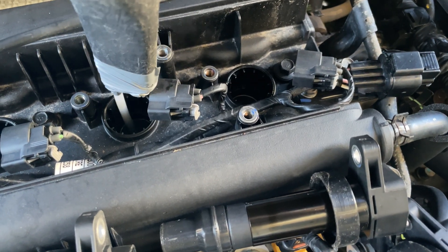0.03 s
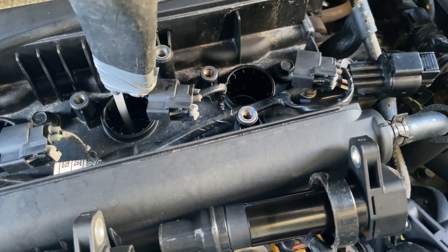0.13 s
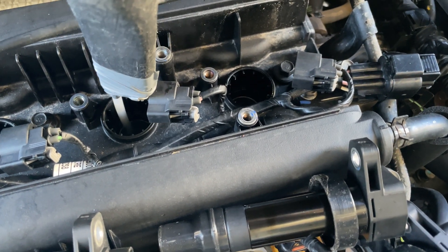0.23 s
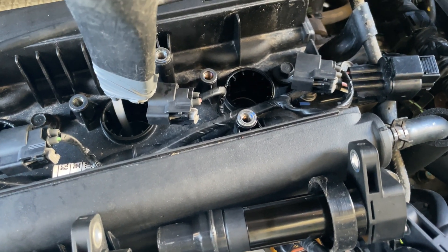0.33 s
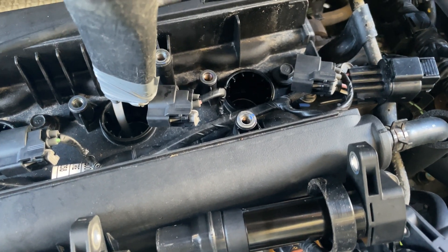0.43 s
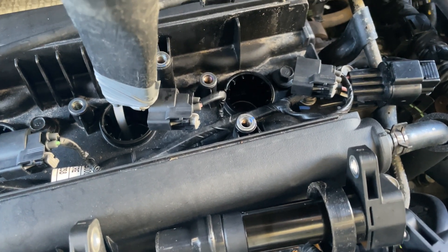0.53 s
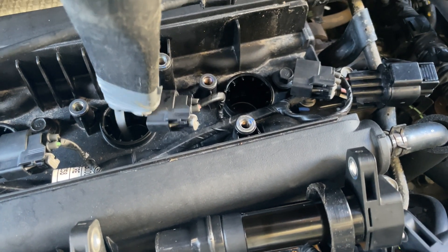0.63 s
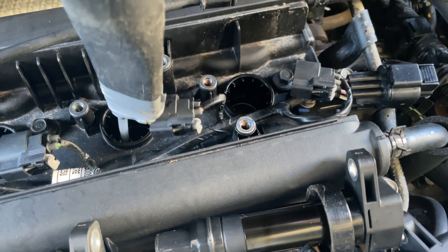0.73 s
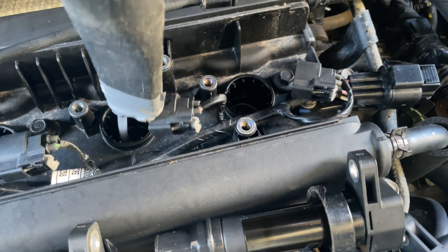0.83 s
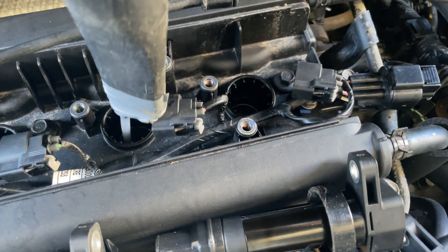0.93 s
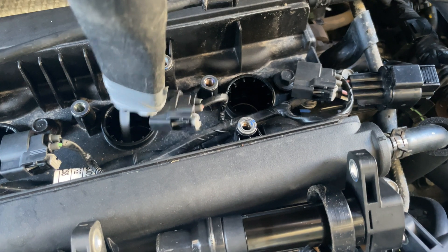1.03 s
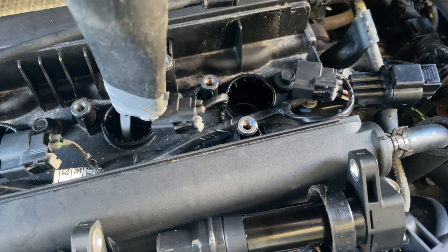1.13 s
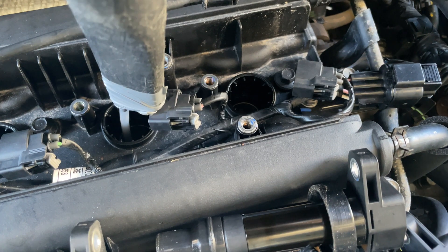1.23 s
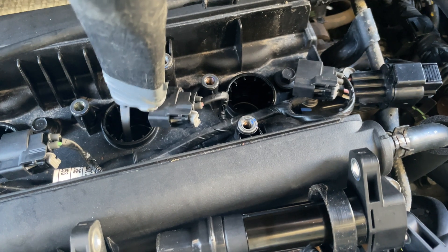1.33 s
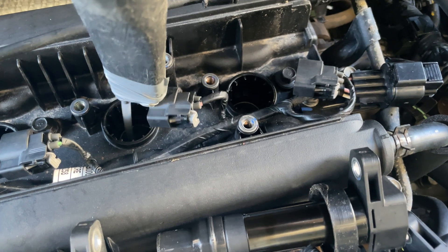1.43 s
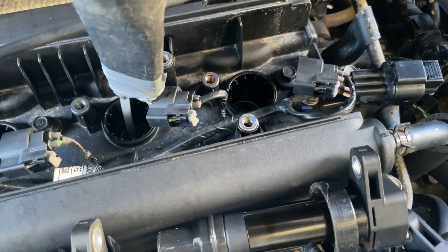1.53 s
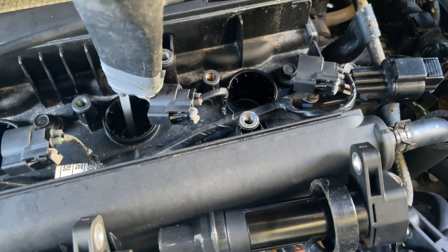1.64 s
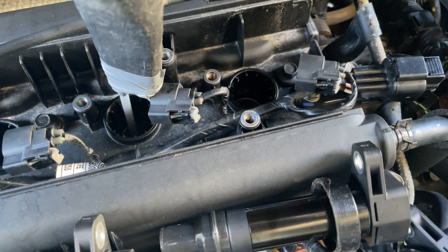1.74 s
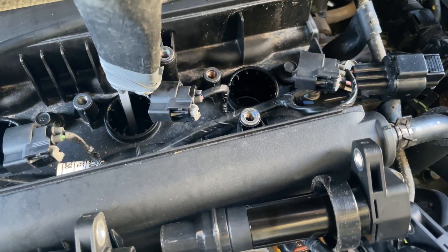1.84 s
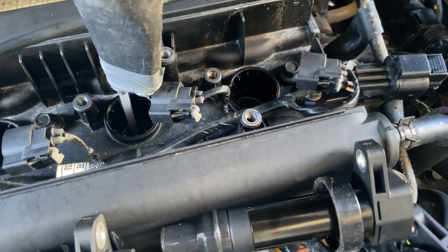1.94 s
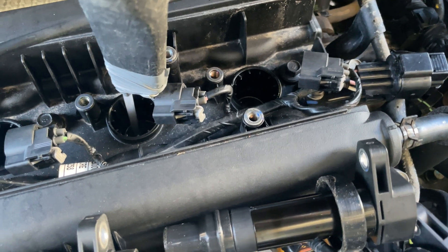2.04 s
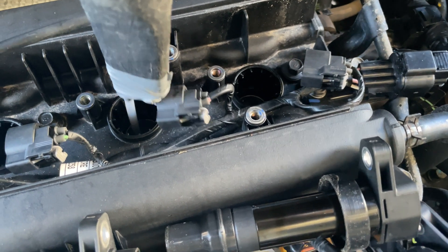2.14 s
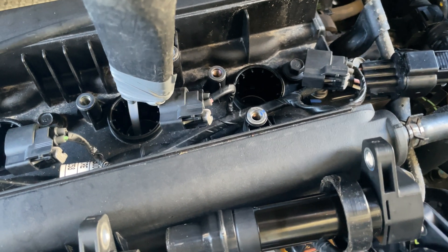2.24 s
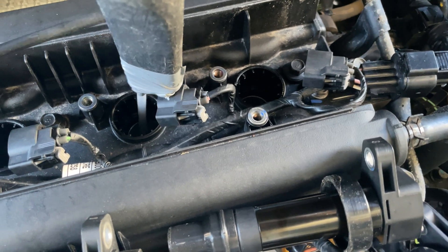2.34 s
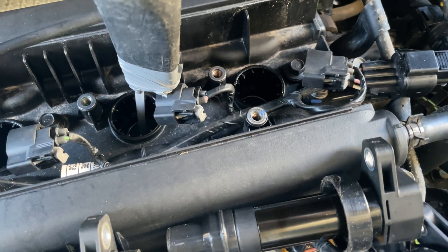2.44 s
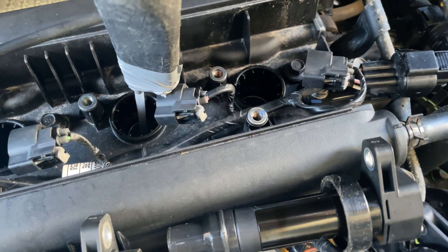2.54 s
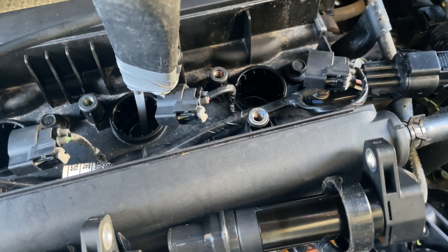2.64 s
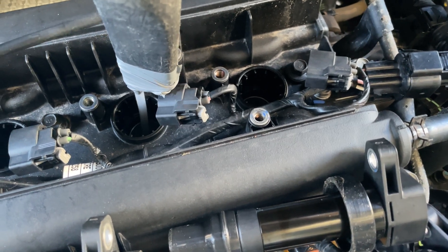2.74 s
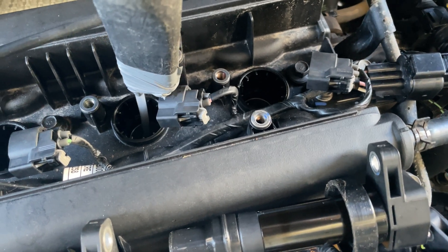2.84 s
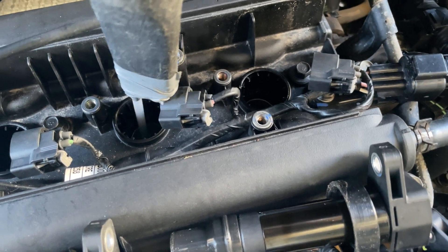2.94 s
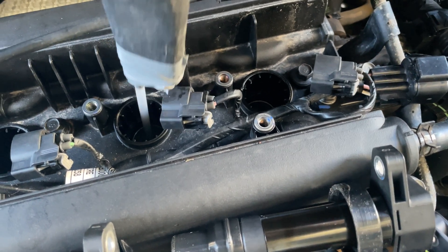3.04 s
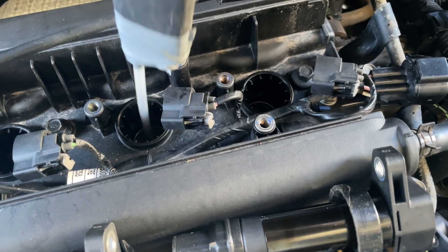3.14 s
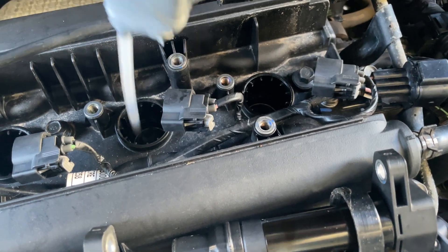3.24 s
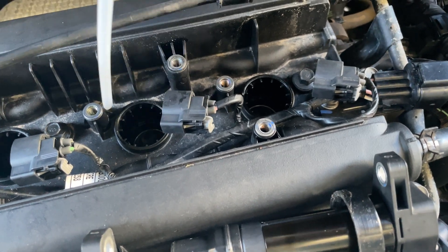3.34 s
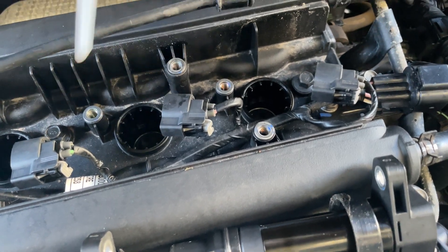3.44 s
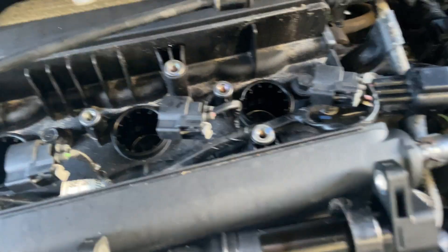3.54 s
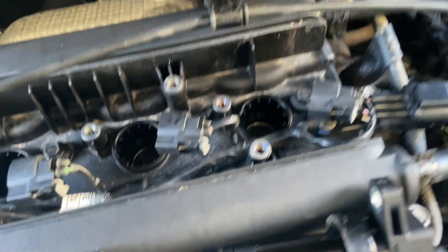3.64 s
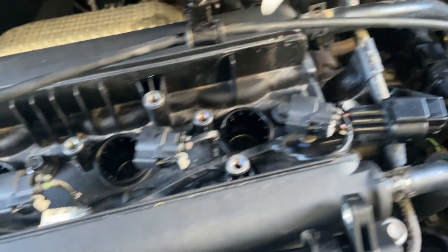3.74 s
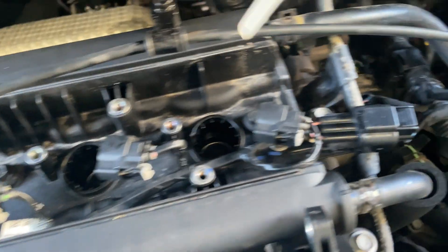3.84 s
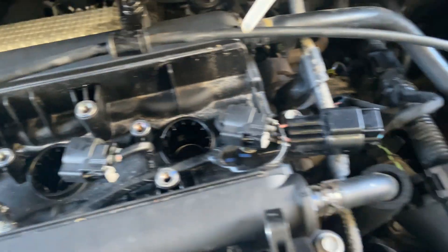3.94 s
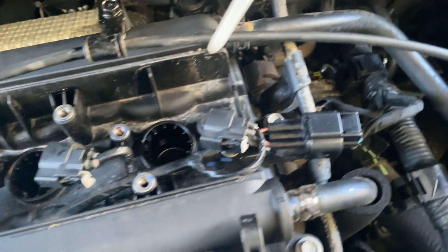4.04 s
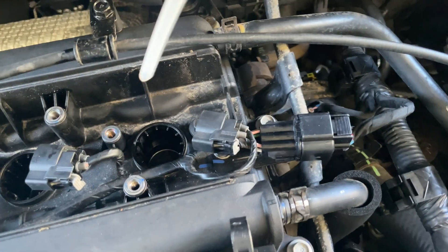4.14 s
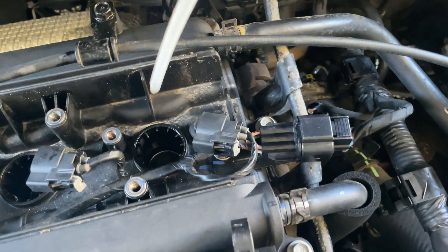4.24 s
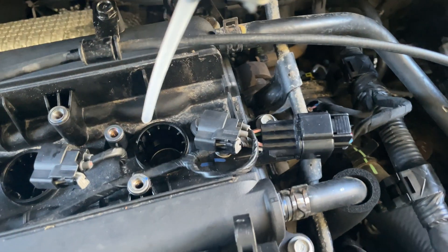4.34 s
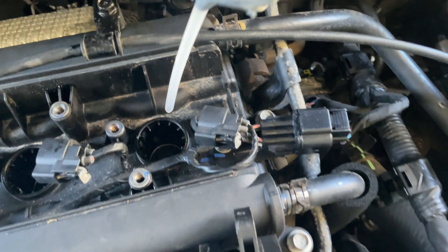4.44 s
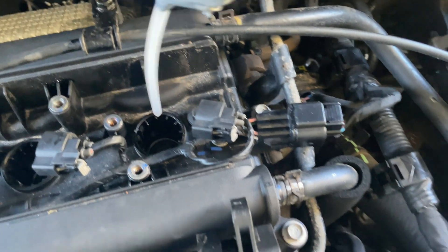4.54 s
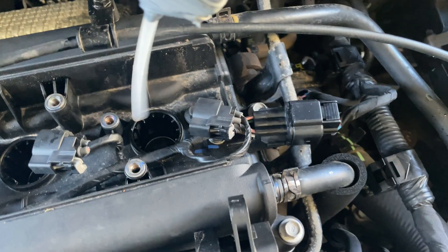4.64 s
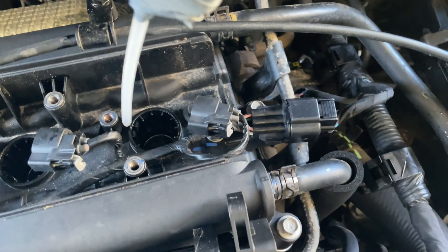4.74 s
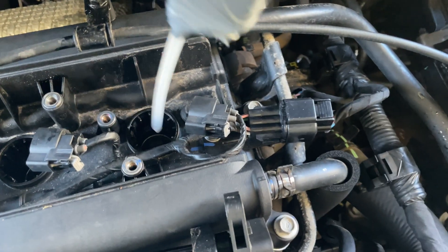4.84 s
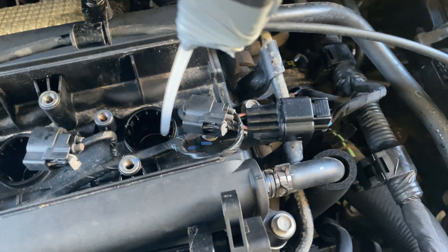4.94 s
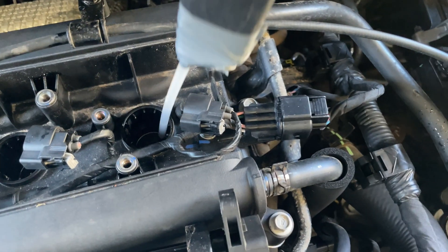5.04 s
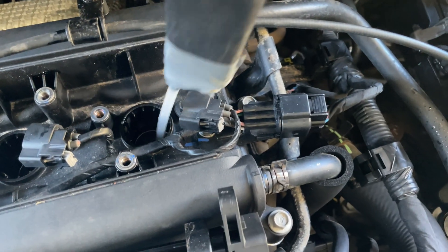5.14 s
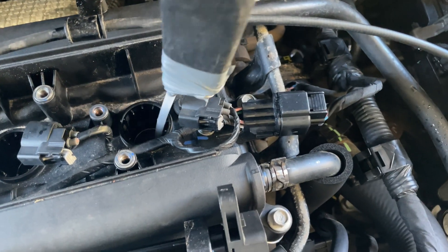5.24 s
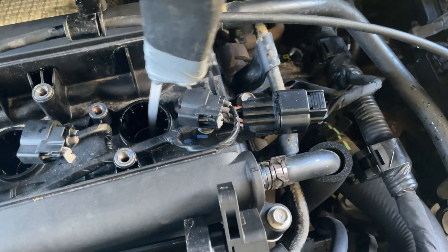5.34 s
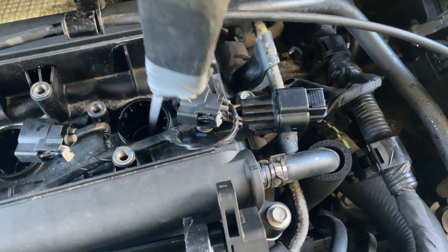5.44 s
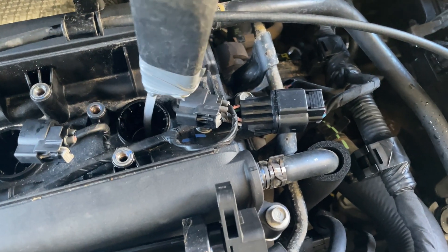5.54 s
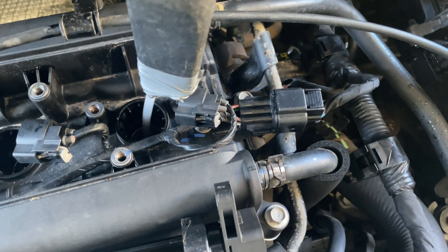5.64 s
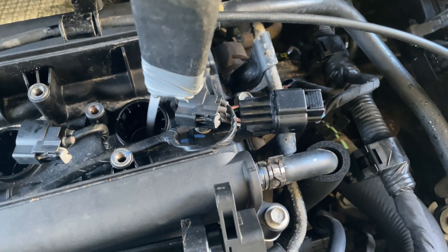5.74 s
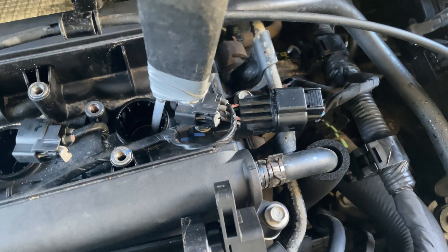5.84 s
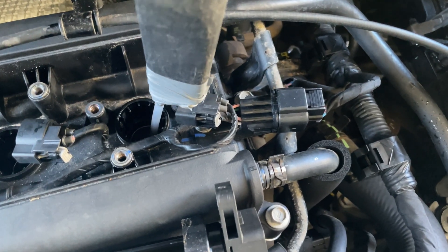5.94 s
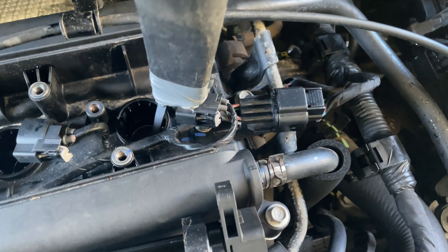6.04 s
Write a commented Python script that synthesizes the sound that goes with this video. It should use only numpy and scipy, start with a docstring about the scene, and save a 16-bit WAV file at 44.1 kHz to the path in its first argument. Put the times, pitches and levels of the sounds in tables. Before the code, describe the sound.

Wet, throaty vacuum slurping rings in a deep engine hole, pauses over fan whine and spitting drops, then resumes louder and more bubbly.

```python
"""A vacuum cleaner sucks water from an engine's spark-plug wells through a thin tube, heard close by.
0-3.3 s: air and water gurgle at the tip and ring the first well like a stopped pipe; air whistles through
a narrow gap until about 0.55 s, then in four squirts up to 1.9 s. 3.1-3.4 s: the tube is lifted out.
3.3-4.8 s: drops spit at the tip; the motor grows louder near 3.9 s. From 4.6 s: the tip enters the next well.
Gurgle is bursty noise through resonances, slugs and bubbles are decaying sines, the motor is orders and air."""
import sys
import numpy as np
from scipy import signal
from scipy.fft import rfft, irfft, next_fast_len
from scipy.io import wavfile
from scipy.ndimage import uniform_filter1d, map_coordinates

SR = 44100
rng = np.random.default_rng(int(sys.argv[2]) if len(sys.argv) > 2 else 0)


def unload_audio(sound):
    """Save the sound as a 16-bit wav file, at the path given as the first command line argument."""
    columns = np.transpose(np.atleast_2d(sound))
    # keep every value between -1 and 1, then stretch to whole-number steps
    steps = np.round(np.clip(columns, -1, 1) * 32767)
    wavfile.write(sys.argv[1], SR, steps.astype(np.int16))


N = 269010

# suction of air and water through the tip, before each layer's trim: time_s, level_db
DRAW = [(0, -26.5), (.25, -25.5), (.75, -24.5), (1.05, -26), (1.5, -25.5), (1.7, -23.5), (2.4, -23.5),
        (3.1, -21.5), (5.0, -19.5), (5.45, -22), (5.85, -17), (6.01, -23.5), (6.1, -33.5)]
# tip lifted out of the first well: time_s, depth (0 open air, 1 bottom)
LIFT = [(3.06, .9), (3.1, .86), (3.12, .68), (3.175, .65), (3.205, .46), (3.3, .3), (3.325, .12),
        (3.37, .04)]
# tip lowered into the next well: time_s, depth (0 open air, 1 bottom)
LOWER = [(4.6, 0.0084), (4.86, 0.063), (4.89, 0.25), (5.015, 0.06), (5.035, 0.35), (5.14, 0.49),
         (5.19, 0.59), (5.33, 0.78), (5.5, 0.87)]
# lowest resonance of the well: time_s, resonance_hz
WELL_HZ = [(2.9, 814), (3.1, 790.6), (3.3, 825.4), (4.85, 832), (5.12, 818), (5.8, 825.5)]
# lowest resonance, spectrum shape: freq_hz, density_db_per_hz
RING = [(400, -46), (650, -29.5), (750, -3), (795, 0.5), (822, 4.5), (850, 3.5), (895, -22.5), (1100, -44)]
# upper shoulder of the lowest resonance: freq_hz, density_db_per_hz
SHOULDER = [(800, -35), (905, -2), (965, -0.5), (1075, 4), (1150, -4.5), (1220, -10.5), (1350, -14.5),
            (1700, -43)]
# broad band below the third resonance: freq_hz, density_db_per_hz
THIRD = [(1500, -25), (1900, -16), (2080, -2), (2300, 1), (2390, 0.5), (2460, 0.5), (2530, -3.5),
         (2650, -9), (3000, -38.5)]
# fifth pipe resonance: freq_hz, density_db_per_hz
FIFTH = [(2800, -25.5), (3500, 1), (3850, 2), (4200, 1), (4800, -24)]
# wet splash in the well: freq_hz, density_db_per_hz
SPLASH = [(200, -20), (350, -6), (520, 0), (740, 8), (900, -8), (1250, 1.5), (1600, -4), (2600, -8.5),
          (3200, -19), (12000, -26)]
# big slugs of water swallowed by the tube, levels before trim:
# start_s, pitch_hz, throb_db, length_s, splash_db
GULPS = [(0.169, 840, -14.5, 0.019, -25), (0.456, 820, -15, 0.0092, -25), (0.64, 800, -13.5, 0.01, -19),
         (0.899, 801, -15.5, 0.017, -19.5), (1.071, 833, -13, 0.017, -20.5),
         (1.093, 833, -13.5, 0.018, -19.5), (1.237, 757, -16.5, 0.015, -18),
         (1.263, 810, -13.5, 0.012, -18), (1.402, 805, -9, 0.019, -20), (1.603, 818, -14, 0.022, -18.5),
         (1.776, 810, -20, 0.0086, -21), (1.923, 833, -14, 0.01, -29), (2.061, 818, -12.5, 0.012, -30),
         (2.113, 795, -11.5, 0.012, -23.5), (2.158, 777, -18, 0.016, -21.5),
         (2.175, 838, -17, 0.057, -22.5), (2.315, 769, -15.5, 0.016, -24), (2.342, 796, -15, 0.019, -25),
         (2.382, 822, -16, 0.017, -23), (2.436, 824, -13, 0.02, -36), (2.453, 824, -11, 0.025, -23),
         (2.476, 828, -14.5, 0.017, -40), (2.594, 790, -10, 0.0056, -25), (2.681, 834, -15.5, 0.032, -23),
         (2.734, 799, -17, 0.0095, -30), (2.791, 815, -15, 0.015, -19), (2.849, 810, -13.5, 0.01, -24),
         (3.04, 774, -10.5, 0.015, -20.5), (3.06, 780, -13, 0.014, -28), (3.132, 775, -14, 0.0098, -22),
         (3.201, 777, -13, 0.014, -18), (3.231, 775, -22, 0.013, -15), (3.261, 815, -24, 0.023, -21),
         (3.289, 850, -19.5, 0.034, -30), (3.32, 814, -21, 0.018, -30), (4.876, 818, -17.5, 0.017, -24),
         (4.908, 878, -19, 0.028, -28), (4.951, 815, -14, 0.01, -20), (4.965, 833, -12, 0.011, -30),
         (4.986, 813, -20.5, 0.026, -36), (5.023, 825, -19, 0.022, -14), (5.058, 819, -6, 0.0086, -25),
         (5.07, 819, -6.5, 0.0073, -26), (5.081, 817, -12.5, 0.019, -22), (5.1, 821, -15, 0.017, -25),
         (5.121, 801, -15, 0.011, -33), (5.145, 826, -19, 0.013, -21), (5.206, 817, -2.5, 0.024, -23),
         (5.234, 824, -7, 0.011, -22), (5.271, 856, -3, 0.011, -15.5), (5.322, 813, -11.5, 0.02, -22),
         (5.378, 826, -6, 0.018, -21), (5.438, 864, -8.5, 0.0094, -17), (5.541, 798, -10, 0.012, -18),
         (5.555, 831, -9, 0.016, -23), (5.594, 841, -12, 0.013, -35), (5.621, 817, -7.5, 0.017, -31),
         (5.667, 832, -7.5, 0.014, -23), (5.724, 816, -11, 0.013, -26), (5.76, 837, -11, 0.017, -24),
         (5.774, 847, -7, 0.015, -27), (5.8, 812, -6.5, 0.023, -27), (5.976, 817, -11, 0.033, -28)]
# single bubbles bursting at the tip: start_s, level_db
POPS = [(.607, -12), (.648, -10.5), (.665, -13), (.726, -11.5), (.770, -9.5), (.779, -17), (.809, -9.5),
        (.819, -13), (.953, -10), (1.169, -17), (1.357, -6.5), (1.379, -12.5), (1.446, -14.5), (1.715, -14),
        (1.824, -12.5), (1.853, -11), (1.889, -7.5), (1.975, -12), (2.005, -12.5), (2.085, -14),
        (2.138, -12), (2.240, -12), (2.396, -7), (2.503, -8.5), (2.551, -19), (2.601, -8), (2.645, -11),
        (2.896, -9.5), (3.004, -12), (3.019, -15), (3.040, -15), (3.074, -8.5), (3.099, -15),
        (3.143, -13.5), (3.169, -11.5), (5.179, -7.5), (5.422, -12), (5.471, -9.5), (5.485, -18),
        (5.501, -6.5), (5.512, -6), (5.658, -5.5), (5.715, -6.5), (5.823, -3), (5.840, -7), (5.865, -6.5),
        (5.904, -11), (5.928, -5), (5.955, -13), (6.004, -13), (6.032, -12.5)]
# what a bursting bubble rings: multiple of the lowest resonance, level_db, decay_s
POP_MODES = [(1, -3, 0.0084), (1.3, -4.5, 0.0032), (2.96, -15.5, 0.0027)]
# water spitting at the tip in open air: start_s, level_db, decay_s
SPITS = [(3.33, -28, 0.026), (3.398, -30, 0.041), (3.635, -39, 0.05), (4.175, -30.5, 0.072),
         (4.3, -34, 0.046), (4.398, -22.5, 0.021), (4.641, -26, 0.061), (4.675, -34, .02),
         (4.697, -29.5, 0.032), (4.79, -35, 0.089)]
# spitting drops: freq_hz, density_db_per_hz
SPRAY = [(250, -15), (380, 0.5), (500, -7), (660, -3), (830, 9), (960, -9), (1130, 4.5), (1450, -6),
         (2400, -7), (2750, -5), (2950, -13), (6000, -19), (14000, -26)]
# air squeezed through a narrow gap until it closes, before each layer's trim: time_s, level_db
GAP_FLOW = [(0, -22.5), (.13, -21), (.335, -20.5), (.36, -25.5), (.45, -24.5), (.48, -32), (.525, -28),
            (.55, -55), (.7, -68)]
# brief squirts of air through the gap, before each layer's trim: centre_s, level_db, half_length_s
SQUIRTS = [(.872, -24.5, 0.016), (1.184, -24.5, 0.013), (1.53, -33, 0.0063), (1.873, -32, 0.0064)]
# hiss of the gap: freq_hz, density_db_per_hz
GAP = [(2000, -16.5), (3100, -13), (3700, -11), (4300, -10), (5000, -16), (5750, -9), (6600, -19),
       (7200, -9), (7700, -14), (10700, 1), (11800, 0.5), (12600, -6), (13500, -4), (14800, -18),
       (15800, -23)]
# resonances of the gap: freq_hz, width_hz, level_db re full flow, gain_db per dB of flow
GAP_MODES = [(5370, 220, -15.5, 1.1), (7100, 110, -9, 3.8), (7270, 460, -12, 0.5)]
# motor as heard from a moving microphone: time_s, shaft_tone_db, blade_whine_db
MOTOR = [(0, -40.5, -52.5), (2, -42, -47), (3.3, -42, -51), (3.78, -41.5, -49), (3.88, -37, -40),
         (4.05, -35, -44), (4.95, -34, -47), (5.12, -33.5, -42), (5.45, -33.5, -37), (6.1, -35, -38)]
# shaft orders following the shaft tone: multiple, level_db
OVERTONES = [(1, -2.5), (2, -19.5)]
# high shaft orders following the blade whine: multiple, level_db
WHINE = [(9, -13), (12, -3)]
# mains hum at the mean shaft-tone level: freq_hz, level_db
HUM = [(100, -52), (200, -57)]
# air moved by the fan, before each layer's trim: time_s, level_db
AIRFLOW = [(.6, -38), (1.2, -36), (2.9, -36.5), (3.8, -38), (3.89, -35.5), (4.7, -34.5), (5.9, -33.5),
           (6.1, -36)]
# blown air, middle band: freq_hz, density_db_per_hz
EXHAUST = [(1500, -22), (2550, -7.5), (2850, -2.5), (3050, -3), (3300, -4), (3700, 0), (4020, -1.5),
           (4430, -0.5), (4920, -17), (5080, -19), (7000, -58.5)]
# blown air, treble: freq_hz, density_db_per_hz
RUSH = [(2500, -13), (4700, -5), (5300, 4.5), (5750, 6.5), (6400, 1.5), (7800, 3.5), (9300, 3),
        (11000, -2.5), (12600, 4), (14000, -6), (15800, -9.5)]
# blown air, bass: freq_hz, density_db_per_hz
RUMBLE = [(20, -58), (60, -13), (150, -12.5), (240, -16), (360, 0.5), (430, -5), (490, -1), (700, -7.5),
          (1080, -8.5), (1220, -16), (1420, -14.5), (1620, -10.5), (2050, -9.5), (3500, -45)]
# resonances of the motor's air duct: freq_hz, width_hz, level_db
DUCT = [(1830, 200, -23), (3250, 200, -10.5), (3490, 260, -9.5), (4225, 100, -4.5), (4550, 93, 2),
        (4747, 200, -1), (4890, 120, -8), (5590, 170, -6), (5860, 230, -2.5), (6080, 260, -5.5),
        (6680, 430, -6)]
# air in the duct: time_s, lower_resonances_db, upper_resonances_db
DUCT_LEVEL = [(0, -45.5, -47), (3.3, -48.5, -52), (3.72, -45.5, -51), (3.9, -40.5, -42), (4.1, -39.5, -42),
              (4.95, -39.5, -44), (5.3, -38.5, -38.5), (5.5, -41.5, -39), (5.9, -40, -38),
              (6.1, -43.5, -43)]
# left-right likeness by frequency: freq_hz, likeness
ALIKE = [(100, 0.37), (2400, 1), (3200, 0.27), (5500, 0.46), (8000, 0.82), (9700, 1), (11000, 1),
         (11800, 0.7), (13200, 0.47), (14200, .98)]
# left-right phase difference by frequency: freq_hz, phase_rad
PHASE = [(300, -.04), (550, -.05), (810, -.3), (980, -.14), (1500, 0), (5000, 0), (6500, .7), (8500, 2.7),
         (9600, 3.12), (11000, 3.16), (13200, 4.9), (14000, 6.28)]

NODE_LEAK = 0.16  # share of a resonance still driven at a node, times depth
HOLLOW_HZ, HOLLOW_WIDTH_HZ, HOLLOW_SHARE = 890, 34, 0.39  # dip between lowest resonance and shoulder
THIRD_HZ, THIRD_WIDTH_HZ = 2438, 160
THIRD_FLUTTER_DB, THIRD_FLUTTER_KNOTS_PER_S = 1.6, 35
CHOKE_LEAD_S, CHOKE_S, CHOKE_DB = .001, .006, 4
GULP_ATTACK_S, GULP_DECAY_S, GULP_RELEASE_S = 0.0021, 0.039, 0.0029
THROB_TRIM_DB, WET_TRIM_DB = -2.1, -4.5
THROB_THIRD_DB = -21  # third resonance re lowest, both driven alike
POP_ATTACK_S, POP_SCATTER = .0008, .012  # scatter: relative detuning
SPATTER_DB, SPATTER_DECAY_S = -17, .009  # level re the bubble's
SPIT_RISE_S = 0.0045
LEAK_DB, LEAK_FADE_DB_PER_S = -39, 2
SHAFT_HZ = 548.2
HUM_FOLLOWS = 0.33  # dB of hum per dB of shaft tone
DUCT_SPLIT_HZ = 5200  # lower resonances lie below this
DUCT_DRIFT, DUCT_SWELL_DB = .0025, 1.2  # drift: relative pitch
LOW_CUT_HZ, TOP_HZ = 42, 15850


def amp(db):
    """Decibels to gain."""
    return 10 ** (np.asarray(db) / 20)


def unit(x):
    """x at rms 1."""
    return x / np.sqrt(np.mean(x ** 2) + 1e-20)


def clock():
    """Time of every sample, in seconds."""
    return np.arange(N) / SR


def age(start_s):
    """Seconds since start_s, zero before it."""
    return np.maximum(clock() - start_s, 0)


def along(points, hz):
    """(freq_hz, value) points read on a log frequency axis."""
    f, v = np.transpose(points)
    return np.interp(np.log(hz + 1), np.log(f), v)


def curves(rows):
    """One value per sample for each column after the time."""
    s, *cols = np.transpose(rows)
    return [np.interp(clock(), s, c) for c in cols]


def wobble(knots_per_s):
    """Smooth random curve through normal knots."""
    knots = rng.standard_normal(int(N * knots_per_s / SR) + 4)
    return map_coordinates(knots, [clock() * knots_per_s])


def white():
    """Mono white noise."""
    return rng.standard_normal(N)


def filtered(x, response):
    """x times a complex response of frequency."""
    m = next_fast_len(N + SR // 4)
    return irfft(rfft(x, m) * response(np.fft.rfftfreq(m, 1 / SR)), m)[..., :N]


def coloured(x, spectrum):
    """x through a minimum-phase body with the given spectrum, at rms 1."""
    def causal(f):
        log_gain = np.log(amp(along(spectrum, f)))
        mirrored = np.r_[log_gain, log_gain[-2:0:-1]]
        return np.exp(np.conj(signal.hilbert(mirrored)[:len(f)]))
    return unit(filtered(x, causal))


def bandpass(f, hz, width_hz):
    """Complex response of one resonance, 1 at its centre."""
    damping = 1j * f * width_hz
    return damping / (hz * hz - f * f + damping)


def resonate(x, hz, width_hz):
    """x through a resonance twice over, for steep sides, at rms 1."""
    return unit(filtered(x, lambda f: bandpass(f, hz, width_hz) ** 2))


def air(spectrum, alike):
    """Stereo noise of rms 1; the mid-side balance sets the left-right likeness."""
    def balance(f):
        angle = np.arccos(np.clip(along(alike, f), -1, 1)) / 2
        return np.array([np.cos(angle), np.sin(angle)])
    mid, side = filtered(rng.standard_normal((2, N)), balance)
    return coloured(np.array([mid + side, mid - side]), spectrum)


def panned(x, left_db):
    """Left-right level difference by (freq_hz, left_db), split evenly over the channels."""
    return filtered(x, lambda f: amp(np.outer([.5, -.5], along(left_db, f))))


def bent(x, pitch):
    """x with its pitch scaled from moment to moment."""
    fine = signal.resample_poly(x, 4, 1)  # oversampled for linear reading
    return map_coordinates(fine, [4 * np.cumsum(pitch)], order=1, mode="mirror")


def well_hz(s):
    """The well's lowest resonance at time s."""
    return np.interp(s, *np.transpose(WELL_HZ))


def coupling(order):
    """Drive of an odd stopped-pipe resonance by the tip: none at the mouth, little at a node."""
    depth = np.clip(curves(np.vstack([LIFT, LOWER]))[0], 0, 1)
    return np.hypot(np.sin(order * np.pi / 2 * depth), NODE_LEAK * depth)


def third_ring(drive, immersion):
    """Third resonance: one clear note, joined by a broad band as immersion grows."""
    note = amp(-5.5) * resonate(drive, THIRD_HZ, THIRD_WIDTH_HZ)
    return note + immersion * coloured(drive * white(), THIRD)


def hollowed(x):
    """Narrow dip of the well's response."""
    return filtered(x, lambda f: 1 - HOLLOW_SHARE * bandpass(f, HOLLOW_HZ, HOLLOW_WIDTH_HZ))


def sputter(bursts_per_s, fade_s, spread_db):
    """Strength of air breaking through water: bursts that swell quickly, then fade; rms 1."""
    gaps, sizes = rng.standard_normal((N // 100, 2)).T
    starts = np.r_[0, np.cumsum(np.exp(.5 * gaps)) / bursts_per_s]
    last = np.searchsorted(starts, clock(), side="right") - 1
    chain = amp(spread_db * sizes[last]) * np.exp(-(clock() - starts[last]) / fade_s)
    return unit(uniform_filter1d(chain, size=SR // 200))


def froth(drops_per_s, drop_db):
    """Turbulent air (white noise) with droplets (sparse clicks) bursting in it."""
    drops = (rng.random(N) < drops_per_s / SR) * white()
    return unit(white() + amp(drop_db) * unit(drops))


def gurgle():
    """Air sputters through water at the tip, rings the well, and chokes as each big bubble breaks loose."""
    draw_db, = curves(DRAW)
    chokes = sum(np.exp(-np.square((clock() - s + CHOKE_LEAD_S) / CHOKE_S)) for s, _ in POPS)
    strength = sputter(bursts_per_s=150, fade_s=0.011, spread_db=1.32)
    strength = strength * amp(-CHOKE_DB * np.minimum(1, chokes))
    flow = lambda: strength * froth(drops_per_s=450, drop_db=-6.5)
    lowest = coupling(order=1)
    deep = lowest ** 2.4  # shoulder and splash need the tip down in the water
    pitch = well_hz(clock())
    reading = np.cumsum(pitch / np.median(pitch))  # the ring follows the pitch
    column = map_coordinates(coloured(flow(), RING), [reading], mode="mirror")
    ring = amp(draw_db - 4) * lowest * column
    shoulder = amp(draw_db - 6.5) * deep * coloured(flow(), SHOULDER)
    splash = amp(draw_db - 14.0) * deep * coloured(flow(), SPLASH)
    flutter_db = THIRD_FLUTTER_DB * wobble(THIRD_FLUTTER_KNOTS_PER_S)
    third = amp(0.31 * draw_db - 28 + flutter_db) * coupling(order=3) * third_ring(flow(), lowest)
    fifth = amp(0.26 * draw_db - 35.0) * coupling(order=5) * coloured(flow(), FIFTH)
    return ring + shoulder + splash + third + fifth


def gulps():
    """A slug of water passes: the air column throbs at its own pitch, with a wet splash on top."""
    t = np.arange(SR // 8) / SR
    ring, overtone, burst = np.zeros((3, N + SR))
    lowest, third = coupling(order=1), coupling(order=3)
    splash = coloured(white(), SHOULDER) + amp(-4.5) * coloured(white(), SPLASH)
    wet = lowest ** 2.0 * splash + amp(-3.5) * third * third_ring(white(), lowest)
    glides = rng.standard_normal(len(GULPS))
    for (s, pitch_hz, throb_db, length_s, splash_db), glide in zip(GULPS, glides):
        shape = (1 - np.exp(-t / GULP_ATTACK_S)) * np.exp(-t / GULP_DECAY_S)
        shape = shape / (1 + np.exp((t - length_s) / GULP_RELEASE_S))
        hz = pitch_hz * (1 + 0.032 * glide * np.exp(-t / 0.0047))  # glides onto its pitch
        phase = 2 * np.pi * np.cumsum(hz) / SR
        throb = amp(throb_db + THROB_TRIM_DB) * shape
        start = round(s * SR)
        ring[start:][:len(t)] += throb * np.sin(phase)
        overtone[start:][:len(t)] += amp(THROB_THIRD_DB) * throb * np.sin(3 * phase)
        burst[start:][:len(t)] += amp(splash_db + WET_TRIM_DB) * shape
    return ring[:N] + overtone[:N] * third / (lowest + 1e-6) + burst[:N] * wet


def pops():
    """A bubble bursts: one sharp kick, then well modes of alternating sign beat and die away."""
    t = np.arange(SR // 16) / SR
    out = np.zeros(N + SR)
    detunings = rng.standard_normal((len(POPS), len(POP_MODES)))
    for (s, db), detunes in zip(POPS, detunings):
        hz = well_hz(s) * (1 + POP_SCATTER * detunes)
        ring = np.zeros(len(t))
        for k, (multiple, mode_db, decay_s) in enumerate(POP_MODES):
            mode = np.exp(-t / decay_s) * np.sin(2 * np.pi * multiple * hz[k] * t)
            ring += (-1) ** k * amp(mode_db) * mode
        out[round(s * SR):][:len(t)] += amp(db) * (1 - np.exp(-t / POP_ATTACK_S)) * ring
    return out[:N]


def spatter():
    """Spray of each bursting bubble: decaying noise in the shoulder and the third-resonance band together."""
    bursts = np.zeros(N)
    for s, db in POPS:
        shape = (1 - np.exp(-age(s) / POP_ATTACK_S)) * np.exp(-age(s) / SPATTER_DECAY_S)
        bursts += amp(db + SPATTER_DB) * shape
    return bursts * (coupling(order=3) * coloured(white(), THIRD) + coloured(white(), SHOULDER))


def spits():
    """Out of the well, stray drops rattle up the tube in bursts that start quickly and die away."""
    bursts = np.zeros(N)
    for s, db, decay_s in SPITS:
        bursts += amp(db) * (1 - np.exp(-age(s) / SPIT_RISE_S)) * np.exp(-age(s) / decay_s)
    rattle = amp(1.3 * wobble(110)) * froth(drops_per_s=500, drop_db=-1)
    return bursts * coloured(rattle, SPRAY)


def swells(rows):
    """Envelope of short flat-topped puffs."""
    return sum(amp(db) * np.exp(-.5 * ((clock() - s) / half_s) ** 4) for s, db, half_s in rows)


def whistle():
    """Air in a wet, narrow gap sputters on a few resonances, half sings in squirts and stirs the well."""
    flow_db, = curves(GAP_FLOW)
    full_db = flow_db.max()
    leak = amp(LEAK_DB - LEAK_FADE_DB_PER_S * clock())
    squirts = swells(SQUIRTS)
    broken = lambda: amp(2.2 * wobble(70))
    hiss_level = (amp(flow_db) + leak) * amp(1.4 * wobble(118.6)) + amp(-2.5) * squirts
    hiss = hiss_level * air(GAP, ALIKE)
    rasp = np.zeros(N)
    for hz, width_hz, db, gain_db in GAP_MODES:
        level_db = full_db + db + gain_db * (flow_db - full_db)
        rasp += amp(level_db) * broken() * resonate(white(), hz, width_hz)
    song_level = amp(-25) * leak * broken() + amp(-1.0) * squirts
    song = song_level * resonate(white(), hz=7196, width_hz=130)
    well = amp(flow_db - 11.5) * coloured(white(), THIRD)
    return hiss + rasp + song + well


def machine():
    """Motor: shaft orders, the whine of a twelve-blade fan, mains hum, and the air that it moves."""
    shaft_db, blade_db = curves(MOTOR)
    air_db, = curves(AIRFLOW)
    turn = 2 * np.pi * np.cumsum(SHAFT_HZ * (1 + 0.00022 * wobble(4.9))) / SR
    tone = sum(amp(shaft_db + db + 1.1 * wobble(5.9)) * np.sin(round(k) * turn) for k, db in OVERTONES)
    whine = sum(amp(blade_db + db + 1.9 * wobble(10)) * np.sin(round(k) * turn) for k, db in WHINE)
    hum = np.zeros(N)
    for hz, db in HUM:
        level_db = db + HUM_FOLLOWS * (shaft_db - shaft_db.mean()) + wobble(5.43)
        hum += amp(level_db) * np.sin(2 * np.pi * hz * clock())
    exhaust_alike = [(2000, 1.0), (3000, -0.25), (5000, -0.3)]
    rumble_alike = [(60, 1.0), (150, 1.0), (400, 0.93), (2000, 0.96)]
    exhaust = amp(air_db + 0.95 * wobble(13)) * air(EXHAUST, exhaust_alike)
    rush = amp(0.7 * air_db - 7.5 + 0.93 * wobble(14)) * air(RUSH, ALIKE)
    rumble = amp(0.72 * air_db - 12.5 + 1.43 * wobble(8.4)) * air(RUMBLE, rumble_alike)
    tones = np.sqrt(2) * (tone + whine + hum)  # levels are rms
    return tones + exhaust + duct() + rush + rumble


def duct():
    """Air howls in the motor's duct; each resonance wanders a little in pitch and level."""
    lower_db, upper_db = curves(DUCT_LEVEL)
    howl = np.zeros((2, N))
    for hz, width_hz, db in DUCT:
        pitch = 1 + DUCT_DRIFT * wobble(4.5)
        channels = resonate(rng.standard_normal((2, N)), hz, width_hz)
        group_db = lower_db if hz < DUCT_SPLIT_HZ else upper_db
        level_db = db + group_db + DUCT_SWELL_DB * wobble(7)
        howl += amp(level_db) * np.array([bent(channel, pitch) for channel in channels])
    return howl


def scene():
    """Well and tip, with a left-right tilt by frequency; whistle; machine in stereo with its own tilt."""
    well_left_db = [(400, -1.0), (730, 9.0), (830, 2.5), (1050, 3.0), (1500, 0.0)]
    machine_left_db = [(150, 1.7), (350, -1.5), (600, -2.5), (1500, 0.0), (4500, -0.5), (8000, 1.63)]
    well = hollowed(gurgle() + gulps() + pops() + spatter() + spits())
    return panned(well, well_left_db) + whistle() + panned(machine(), machine_left_db)


def record(dry):
    """Stereo phase set by frequency, opposed near 10 kHz; lowest bass cut, nothing above TOP_HZ."""
    def stereo(f):
        band = f ** 4 / np.hypot(f ** 4, LOW_CUT_HZ ** 4) * (f < TOP_HZ)
        return np.array([np.ones_like(f), np.exp(-1j * along(PHASE, f))]) * band
    return filtered(dry, stereo)


dry = scene()
out = record(dry)
unload_audio(out)
```